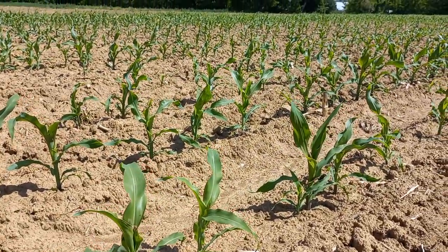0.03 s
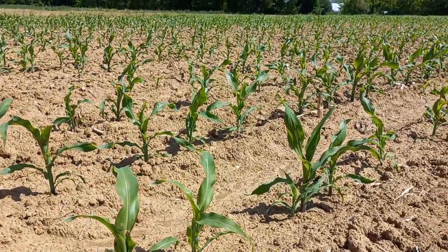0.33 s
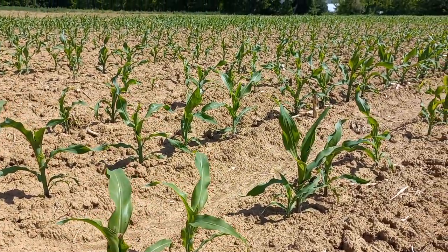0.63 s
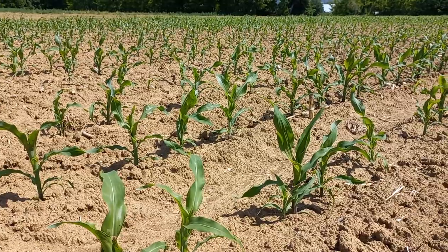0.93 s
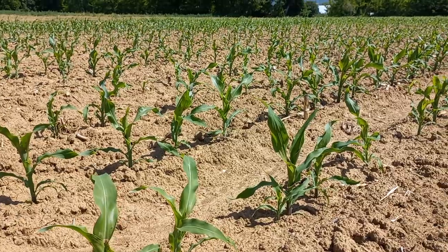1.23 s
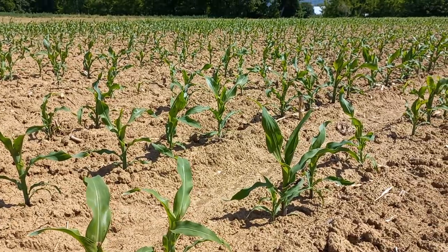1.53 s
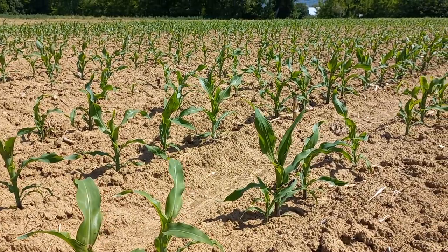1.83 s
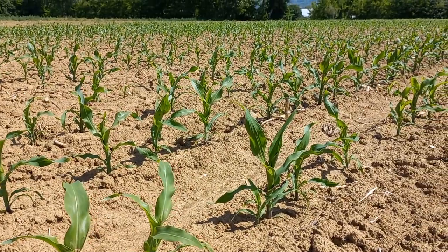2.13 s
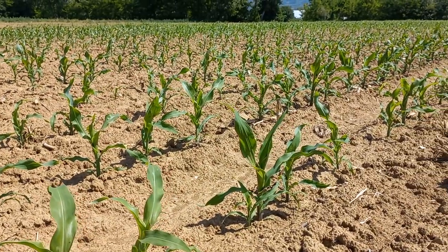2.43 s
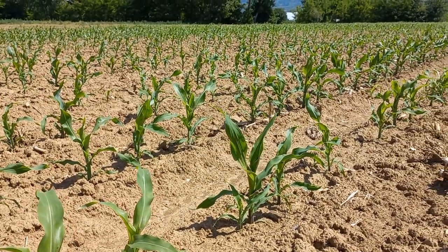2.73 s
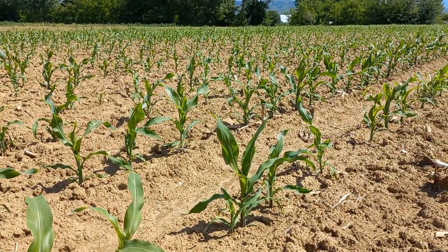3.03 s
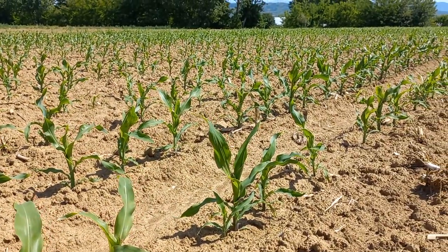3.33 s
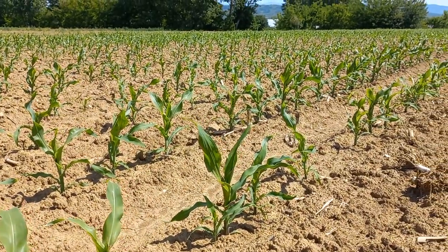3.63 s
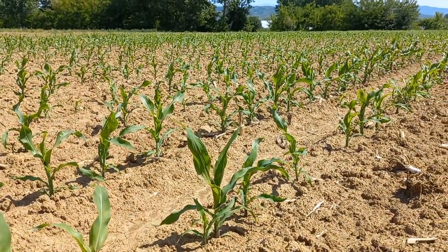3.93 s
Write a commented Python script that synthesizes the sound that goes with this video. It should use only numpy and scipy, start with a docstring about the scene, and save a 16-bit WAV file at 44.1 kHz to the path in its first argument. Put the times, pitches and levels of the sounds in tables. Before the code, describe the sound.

A distant engine chugs steadily across an open field, with a light breeze near the end.

```python
"""Distant engine across a maize field

A slow single-cylinder engine chugs steadily, far off to the right. Each firing thumps through
the exhaust, puffs gas and rattles the casing, over a fainter hum and a wash of open air.
Far birds chirp, something dry ticks once, and near the end a breeze buffets the right microphone."""
import sys
import numpy as np
from scipy import signal
from scipy.fft import rfft, irfft
from scipy.io import wavfile
from scipy.ndimage import uniform_filter1d

SR = 44100
rng = np.random.default_rng(int(sys.argv[2]) if len(sys.argv) > 2 else 0)


def generate_wav(signal):
    """Clip the signal to [-1, 1] and save it as 16-bit WAV at the path in sys.argv[1]."""
    frames = np.transpose(np.atleast_2d(signal))
    scaled = np.clip(frames, -1, 1) * 32767
    pcm = np.round(scaled).astype(np.int16)
    wavfile.write(sys.argv[1], SR, pcm)


N = 176400
T = np.arange(N) / SR
RIGHT_LEAD_S = .00051


def amp(db):
    """Decibels to gain."""
    return 10 ** (np.asarray(db) / 20)


def unit(x):
    """Scales to rms 1."""
    return x / np.sqrt(np.mean(x ** 2) + 1e-20)


def curve_at(points, hz):
    """Interpolates a table on a log-frequency axis."""
    f, value = np.transpose(points)
    return np.interp(np.log(hz + 1), np.log(f + 1), value)


def add(mix, start_s, sound):
    """Mixes a sound in place."""
    part = mix[max(round(start_s * SR), 0):][:len(sound)]
    part += sound[:len(part)]


def drift(cutoff_hz):
    """Low-passed random wander, rms 1."""
    hz = np.fft.rfftfreq(N, 1 / SR)
    return unit(irfft(rfft(rng.standard_normal(N)) * (hz > 0) / (1 + (hz / cutoff_hz) ** 4), N))


def noise(spectrum):
    """Coloured noise, rms 1."""
    gain = amp(curve_at(spectrum, np.fft.rfftfreq(N, 1 / SR)))
    return unit(irfft(rfft(rng.standard_normal(N)) * gain, N))


def scatter(x, echo_db, t60_s):
    """Adds a short spray of reflections from soil and trees."""
    t = T[:SR // 4]
    tail = rng.standard_normal(len(t)) * amp(-60 * t / t60_s)
    echoes = signal.oaconvolve(x, tail / np.linalg.norm(tail))[:N]
    return (x + amp(echo_db) * echoes) / np.sqrt(1 + amp(echo_db) ** 2)


def resonate(x, hz, width_hz):
    """Swept resonance, peak gain 1."""
    carrier = np.exp(2j * np.pi * np.cumsum(hz) / SR)
    pole = np.exp(-np.pi * width_hz / SR)
    return 2 * (carrier * signal.lfilter([1 - pole], [1, -pole], x / carrier)).real


def from_right(x):
    """Stereo pair; the sound reaches the right microphone first."""
    return np.array([np.interp(T + side * RIGHT_LEAD_S / 2, T, x) for side in (-1, 1)])


# Engine speed: time_s, firing_rate_hz
ENGINE_SPEED = [(0, 21.9), (.9, 21.945), (2.05, 21.95), (2.35, 22.0), (2.8, 21.96), (4, 21.94)]


def engine_cycles(firing_at_s=2.21746):
    """Running cycle count; the cylinder fires at each whole number."""
    cycles = np.cumsum(np.interp(T, *np.transpose(ENGINE_SPEED))) / SR
    return cycles - np.interp(firing_at_s, T, cycles)


# Pipe harmonics of the firing rate: order, level_db
EXHAUST_HARMONICS = [(2, -91), (3, -59.5), (4, -70), (5, -45.5), (6, -50.5), (7, -50.5), (8, -56.5),
                     (9, -48), (10, -48.5), (11, -66), (12, -60), (13, -61.5), (14, -62.5), (15, -80.5),
                     (16, -66.5), (17, -59.5), (18, -65), (19, -72), (20, -71), (21, -67), (22, -72),
                     (23, -71.5), (24, -61.5), (25, -62.5), (26, -88.5), (27, -80.5), (28, -64.5),
                     (29, -60), (30, -65), (31, -80.5), (32, -90.5)]
# Two blows, then two inverted reflections: delay_s, gain
EXHAUST_BLOWS = [(0, 1), (.0153, 1.0), (.0215, -.38), (.0329, -.34)]


def exhaust(cycles, muffler_hz=(80, 200), jitter_s=.00005, trim_db=-.5, uneven_db=.23):
    """Exhaust thump: blows and muffler set each harmonic's phase, the pipe its level."""
    order, level_db = np.transpose(EXHAUST_HARMONICS)
    rate_hz = ENGINE_SPEED[0][1]
    hz = order * rate_hz
    muffler = signal.freqs(*signal.butter(2, muffler_hz, "band", analog=True), hz)[1]
    blows = sum(gain * np.exp(-2j * np.pi * hz * delay_s) for delay_s, gain in EXHAUST_BLOWS)
    phases = np.angle(muffler * blows)
    cycles = cycles + jitter_s * rate_hz * drift(8.3)
    note = sum(gain * np.cos(2 * np.pi * k * cycles + phase)
               for k, gain, phase in zip(order, amp(level_db), phases))
    return -np.sqrt(2) * note * amp(trim_db + uneven_db * drift(6.3))


# Gas puffs after a firing: delay_s, sigma_s, level_db
GAS_PUFFS = [(.007, 0.0019, -64), (0.015, 0.0047, -56.5)]
# Gas noise: freq_hz, relative_db
PUFF_SPECTRUM = [(40, -54.5), (200, -4.5), (330, -6), (460, -6.5), (560, 8), (650, -8), (720, -20),
                 (1200, -31.5), (3000, -60)]


def puffs(firings_s):
    """Gas rushes out twice per cycle."""
    t = T[:SR // 10]
    pair = sum(amp(db) * np.exp(-.5 * ((t - delay_s) / sigma_s) ** 2)
               for delay_s, sigma_s, db in GAS_PUFFS)
    envelope = np.zeros(N)
    for start_s in firings_s:
        add(envelope, start_s, pair)
    return envelope * noise(PUFF_SPECTRUM)


# Mechanism knocks after a firing: delay_s, relative_db
MECHANISM_KNOCKS = [(.002, -4.5), (.012, 2.5), (0.0187, -0.5), (0.0308, -2), (.037, -12), (.043, 0)]
# Casing modes: pitch_hz, relative_db, t60_s
CASING_MODES = [(796, -14, 0.062), (1085, -11, 0.059), (1358, 4.5, 0.052), (1418, 0, 0.057),
                (1630, -6.5, 0.029), (1696, -6, .03), (2120, 0.5, 0.047), (2268, -1, 0.015),
                (2670, -10, 0.0092)]
# Bright spot, sliding down as the microphone moves: time_s, centre_hz, gain_db
BRIGHT_SPOT = [(0, 1800, 7), (.7, 1800, 2.5), (1.6, 1650, -3.5), (4, 1520, -14)]


def rattle(firings_s, level_db=-62, fade_db_per_s=.5, jitter_s=.00003, spread_db=.75):
    """The same few knocks ring the casing every cycle, never quite alike."""
    knocks = np.zeros(N)
    for delay_s, db in MECHANISM_KNOCKS:
        for start_s in firings_s:
            late, strong = rng.standard_normal(2)
            add(knocks, start_s + delay_s + jitter_s * late, amp([db + spread_db * strong]))
    t = T[:SR // 10]
    ring = sum(amp(db - 60 * t / t60_s) * np.sin(2 * np.pi * hz * t) for hz, db, t60_s in CASING_MODES)
    casing = signal.oaconvolve(knocks, ring)[:N]
    bandpass = signal.butter(6, [700, 2700], "band", fs=SR, output="sos")
    distant = scatter(signal.sosfilt(bandpass, casing), echo_db=-6.5, t60_s=.06)
    time_s, centre_hz, gain_db = np.transpose(BRIGHT_SPOT)
    bright = resonate(distant, np.interp(T, time_s, centre_hz), width_hz=150)
    bright *= amp(np.interp(T, time_s, gain_db))
    return amp(level_db - fade_db_per_s * (T - T.mean())) * unit(distant + bright)


def hum(pitch_hz=73.86, wander_hz=.14, level_db=-59.5, waver_db=3.5):
    """A far hum wavers and beats against the engine."""
    envelope = amp(level_db + waver_db * drift(3.3))
    hz = pitch_hz + wander_hz * drift(2)
    return np.sqrt(2) * envelope * np.sin(2 * np.pi * np.cumsum(hz) / SR)


# Far wash: freq_hz, relative_db
WASH_SPECTRUM = [(20, -28), (42, -22), (60, -4.5), (100, 1), (160, -3), (300, -4), (450, -12), (620, -3.5),
                 (720, -14.5), (1000, -16), (1250, -17), (1400, -13.5), (1800, -14.5), (2250, -19),
                 (2650, -22.5), (3050, -33.5), (4200, -40), (5800, -45.5), (6600, -42.5), (8700, -45),
                 (9400, -49), (12800, -42.5), (16000, -45.5)]
# Left-right likeness: freq_hz, coherence
WASH_COHERENCE = [(60, 0.65), (150, 0.77), (300, 0.92), (600, 1), (1000, 0.52), (2000, 0.37), (4000, 0.1),
                  (8000, 0.082), (14000, .1)]


def wash(level_db=-52.5, patch_db=2):
    """Scattered engine noise and open air, with drifting spectral patches."""
    hz = np.fft.rfftfreq(2048, 1 / SR)
    draws = rng.standard_normal((N // 512 + 5, len(hz), 5))  # frame, bin, stream
    right = draws[..., 0] + 1j * draws[..., 1]
    independent = draws[..., 2] + 1j * draws[..., 3]
    patches = uniform_filter1d(draws[..., 4], size=12, axis=0)
    patches = unit(uniform_filter1d(patches, size=10, axis=1))
    coherence = curve_at(WASH_COHERENCE, hz)
    left = coherence * right + np.sqrt(1 - coherence ** 2) * independent
    left *= np.exp(-2j * np.pi * hz * RIGHT_LEAD_S)
    spectra = np.array([left, right]) * amp(curve_at(WASH_SPECTRUM, hz) + patch_db * patches)
    air = signal.istft(spectra.transpose(0, 2, 1), nperseg=2048, noverlap=1536)[1]
    return amp(level_db) * unit(air[:, :N])


# Bird calls: middle_s, length_s, pitch_hz, level_db, trill_depth
BIRD_CHIRPS = [(0.809, 0.29, 4340, -78, 0.08), (1.012, .06, 5030, -77.5, 0.02),
               (2.498, 0.049, 5040, -77, .04), (3.804, .06, 4870, -80.5, 0.06)]


def birds(fall=.09, trill_hz=55.3, blur=.84):
    """Falling trilled chirps, blurred by distance."""
    calls = np.zeros(N)
    for middle_s, length_s, pitch_hz, level_db, trill_depth in BIRD_CHIRPS:
        position = np.clip((T - middle_s) / length_s, -.5, .5)
        trill = np.sin(2 * np.pi * trill_hz * T) + blur * drift(498)
        hz = pitch_hz * (1 - fall * position + trill_depth * trill)
        envelope = amp(level_db) * np.cos(np.pi * position)
        calls += np.sqrt(2) * envelope * np.sin(2 * np.pi * np.cumsum(hz) / SR)
    return scatter(calls, echo_db=-4, t60_s=.17)


def tick(start_s=2.6745, level_db=-58, snap_t60_s=.007, rustle_db=-19, rustle_t60_s=.15):
    """One tiny dry snap and a short rustle, to the right."""
    t = T[:SR // 5]
    envelope = amp(-60 * t / snap_t60_s) + amp(rustle_db - 60 * t / rustle_t60_s)
    hiss = noise([(3000, -40), (5500, -22), (6500, -4), (10000, -9), (12500, 6), (16000, 2)])
    snap = np.zeros(N)
    add(snap, start_s, amp(level_db) * envelope * hiss[:len(t)])
    return snap * amp([[-6], [0]])


# Breeze on the right microphone: time_s, level_db
BREEZE_LEVEL = [(0, -81), (2.8, -67), (3.22, -52), (3.35, -40), (3.55, -35.5), (3.66, -37), (3.76, -35.5),
                (4, -31.5)]
# Buffeting: freq_hz, relative_db
BREEZE_SPECTRUM = [(20, -25), (40, -9), (70, -0.5), (110, 4.5), (170, -4.5), (280, -13.5), (500, -27.5),
                   (1200, -47), (4000, -80), (16000, -110)]


def breeze(lump_db=.73, left_db=-12):
    """Lumpy buffeting, mostly on the right microphone."""
    envelope = amp(np.interp(T, *np.transpose(BREEZE_LEVEL)) + lump_db * drift(4.7))
    return envelope * np.array([amp(left_db) * noise(BREEZE_SPECTRUM), noise(BREEZE_SPECTRUM)])


def scene():
    """Engine, hum and birds from the right, wash all round, then tick and breeze."""
    cycles = engine_cycles()
    firings_s = np.interp(np.arange(np.ceil(cycles[0]), cycles[-1]), cycles, T)
    engine = exhaust(cycles) + puffs(firings_s) + rattle(firings_s)
    return from_right(engine + hum() + birds()) + wash() + tick() + breeze()


# Microphone balance: freq_hz, left_minus_right_db
MIC_BALANCE = [(100, 0), (650, 0.5), (850, 1.5), (1000, -6), (1550, -6), (1800, -7.5), (2130, -17),
               (2300, 0), (2500, -6.5), (2800, -7), (3200, -3), (5000, -7.5), (8000, -5.5), (13000, 3)]


def record(dry):
    """Each microphone's colour, then the band limit."""
    hz = np.linspace(0, SR / 2, 1025)
    ratio = amp(curve_at(MIC_BALANCE, hz))
    right_gain = np.sqrt(2 / (1 + ratio ** 2))  # constant total power
    mics = [signal.firwin2(1023, hz, gain, fs=SR) for gain in (ratio * right_gain, right_gain)]
    coloured = np.array([signal.oaconvolve(x, mic, "same") for x, mic in zip(dry, mics)])
    lowpass = signal.firwin(511, cutoff=15750, window=("kaiser", 9), fs=SR)
    return signal.oaconvolve(coloured, lowpass[None], "same")


dry = scene()
out = record(dry)
generate_wav(out)
```